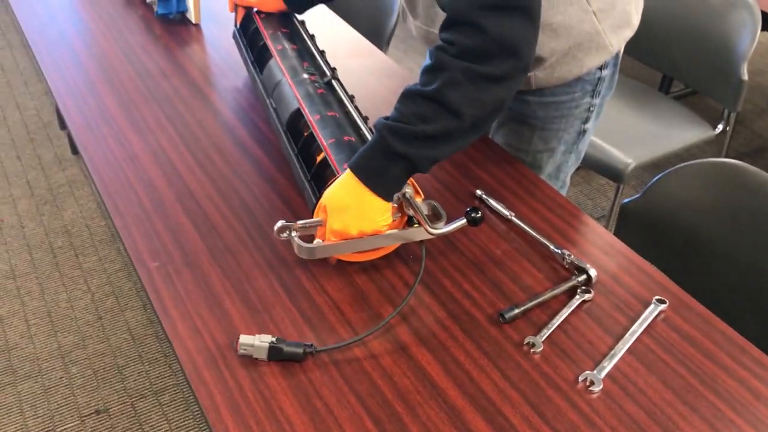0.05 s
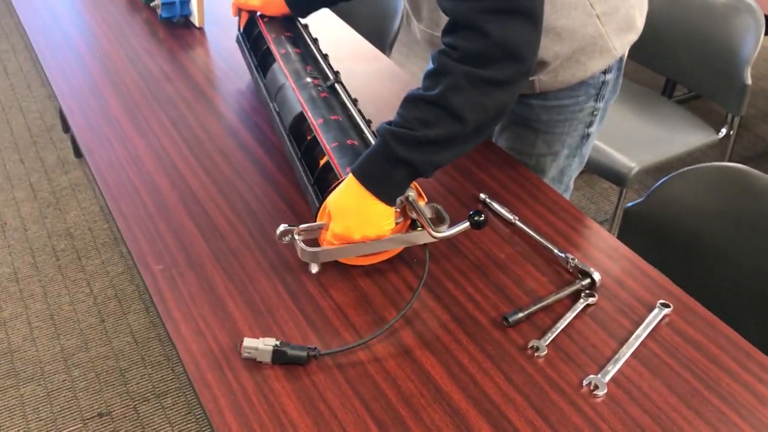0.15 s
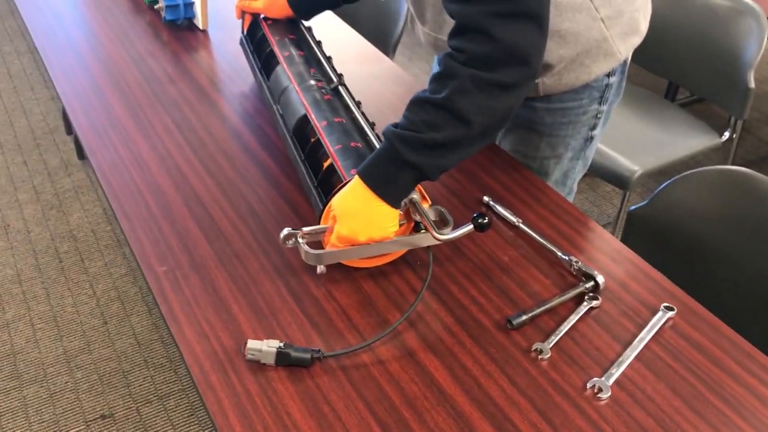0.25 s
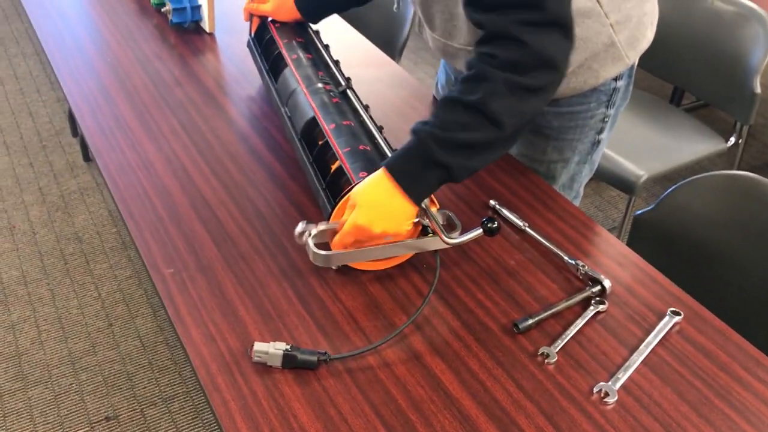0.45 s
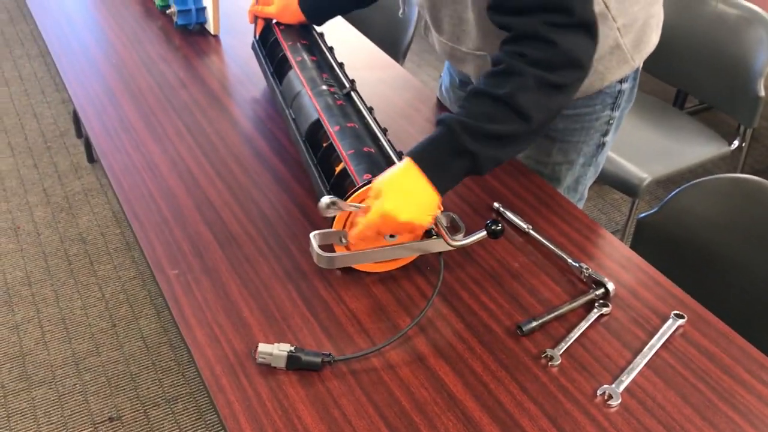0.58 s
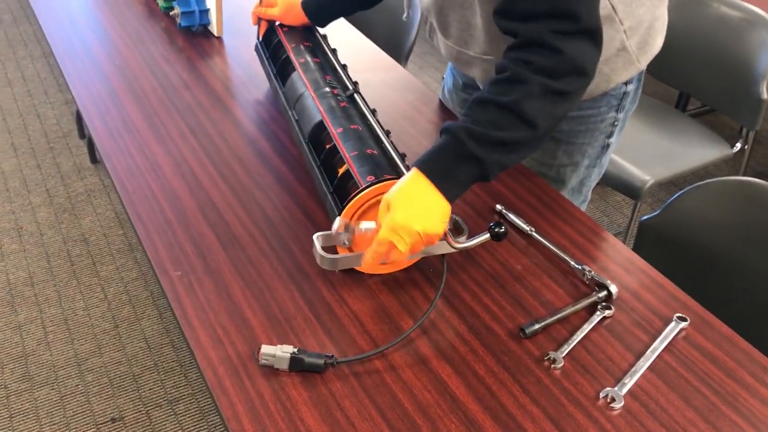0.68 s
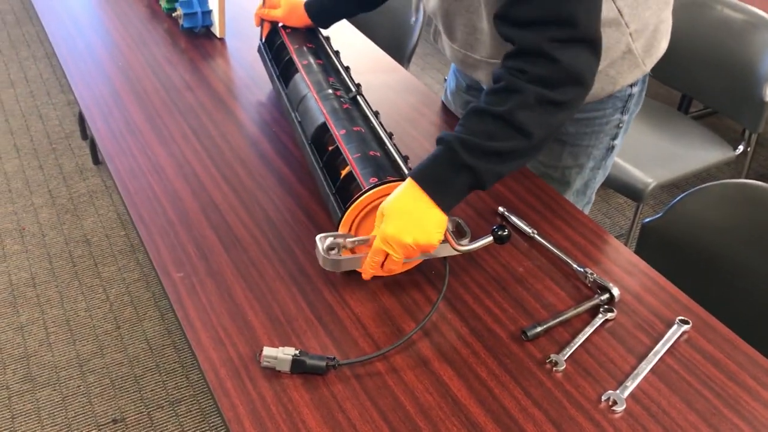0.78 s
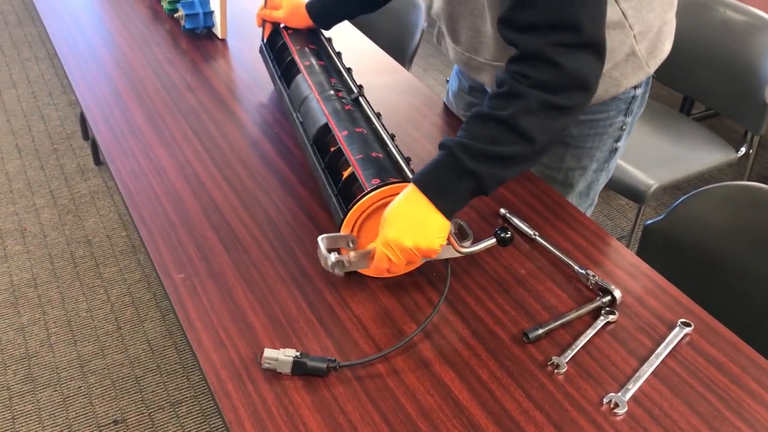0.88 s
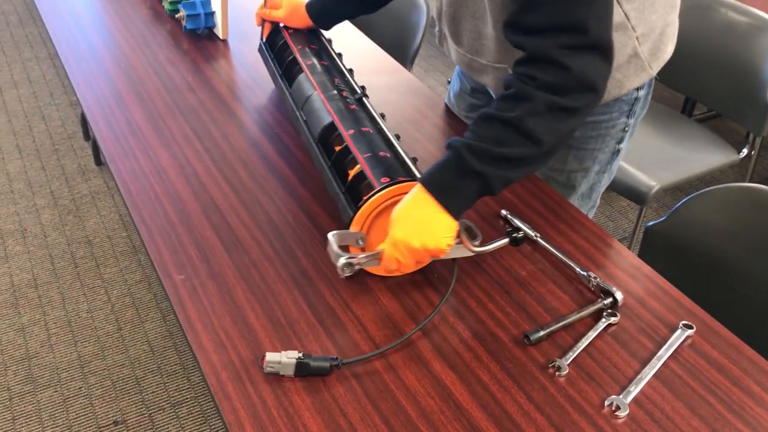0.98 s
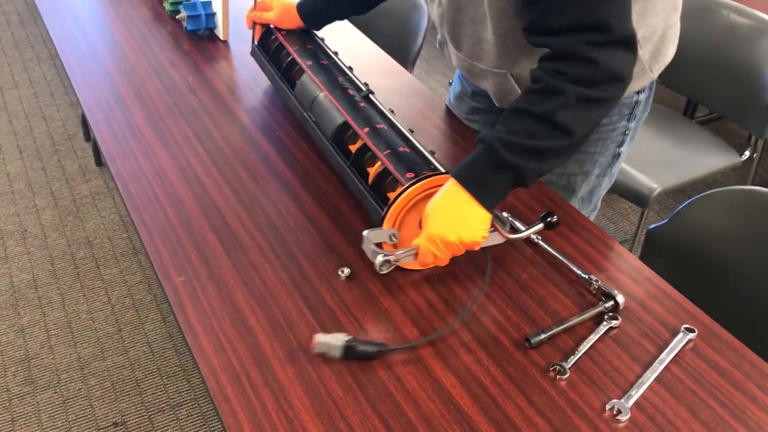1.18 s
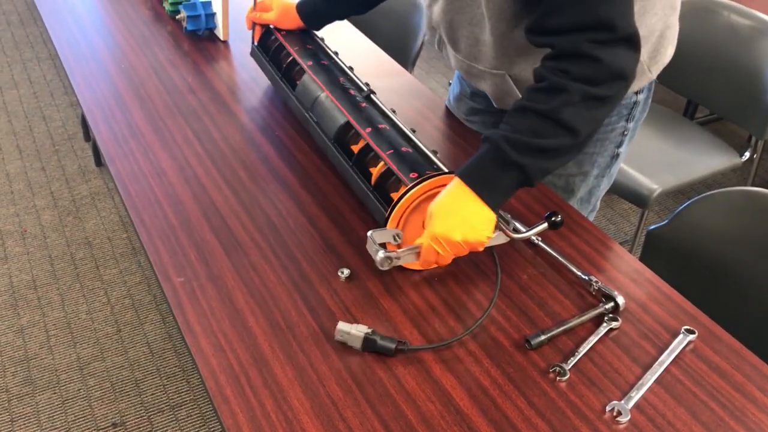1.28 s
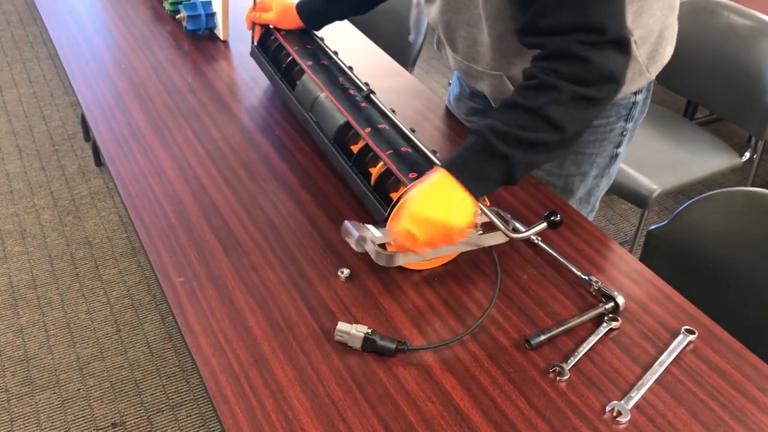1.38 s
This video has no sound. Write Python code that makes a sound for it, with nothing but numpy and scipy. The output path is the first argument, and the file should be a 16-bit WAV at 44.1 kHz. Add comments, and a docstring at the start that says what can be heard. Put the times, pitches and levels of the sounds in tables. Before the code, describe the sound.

A small metal part drops on a wooden table, bouncing and clinking to rest.

```python
"""In a small room, a small steel part falls on a wooden table and bounces ever faster.
Each bounce is a sharp tick plus a knock of the table top. The part clinks twice against metal
and rattles to rest. Around it a heavy drum with a steel crank is handled: the crank clanks,
a glove scuffs it, and the drum slides with a hollow groan while the table rumbles under it."""
import sys
import numpy as np
from scipy import signal
from scipy.fft import rfft, irfft
from scipy.io import wavfile

SR = 44100
rng = np.random.default_rng(int(sys.argv[2]) if len(sys.argv) > 2 else 0)


def waveform_to_disk(signal):
    """Save audio, clipped to [-1, 1], as 16-bit WAV at the path in sys.argv[1]."""
    frames = np.transpose(np.atleast_2d(signal))
    scaled = np.clip(frames, -1, 1) * 32767
    samples = np.round(scaled).astype(np.int16)
    wavfile.write(sys.argv[1], SR, samples)


N = 63945

# bounces on the wood (time [s], tick level [dB], knock level [dB], brightness [dB per octave])
BOUNCES = [(0.2038, 3, -1, -1.96), (0.3497, -3.5, -5, -1.6), (0.4591, .5, -6, 0), (0.4936, -7.5, -12, -0.3),
           (0.5475, -5.5, -12.5, -1.4), (0.6173, -4, -12, 1.3), (.6300, -15, -17, -0.5),
           (0.6607, -14.5, -20, -1.5), (0.6821, -11.5, -19.5, 2.5), (0.6905, -13, -19, -0.2),
           (0.7036, -15.5, -22.5, -3.1), (0.7189, -30, -26, 4.5), (0.7294, -20, -28, 5),
           (0.7321, -33, -21, 12.5), (.805, -22.5, -30, -4), (.8375, -28, -25, 2.9),
           (0.8692, -21, -26, 1.7), (0.882, -34.5, -36.5, 9), (0.897, -31, -29.5, 0.5),
           (0.9262, -34, -34.5, 4), (0.9441, -16, -26, 3.1)]
KNOCK_LAG_S = 0.0008  # waves come back from the edges of the top


def bounces():
    """Each time the steel part lands, it ticks and makes the table top ring."""
    out, contact = np.zeros(N), tick()
    for s, tick_db, knock_db, slope_db in BOUNCES:
        add(out, s - TICK_LEAD_S, amp(tick_db) * brighten(contact, slope_db))
        add(out, s + KNOCK_LAG_S, amp(knock_db) * brighten(knock(), slope_db))
    return out


# tone of the tick (pitch [Hz], level [dB])
TICK_TONE = [(30, -48), (150, -37), (500, -9), (1100, 5.5), (2500, 2.5), (4000, 1.5), (7800, -6),
             (10500, -24.5), (13000, -26), (16000, -26.5)]
TICK_DB, TICK_LEAD_S = 12, 0.001
SPREAD_S = 0.001296  # how far 1 kHz trails the very highest pitches


def tick():
    """A hit bends the wood. High pitches travel faster, so the wave is a tiny falling chirp."""
    hz = freqs()
    chirp = 4 * np.pi * SPREAD_S * (np.sqrt(1000 * hz) - hz / 2 * np.sqrt(1 / 7))
    phase = chirp + 2 * np.pi * hz * TICK_LEAD_S
    wave = irfft(amp(TICK_DB + read(TICK_TONE, hz)) * np.exp(-1j * phase), N)
    return wave * (np.arange(N) < N // 8)


# dense ring of the table top (pitch [Hz], level [dB], time to fade by 60 dB [s])
TABLE_RING = [(61.3, -34, 0.21), (215, -18.5, 0.34), (377, -12.5, 0.19), (550, -23, 0.16), (660, -11, 0.13),
              (860, -6, .1), (1420, 1.5, 0.075), (2600, -4, 0.093), (3880, -4, 0.02), (4870, -20.5, 0.079),
              (6600, -13.5, 0.019), (9400, -38, .035), (12300, -32, 0.078), (16000, -43, 0.03)]
# clearest notes of the table (pitch [Hz], level [dB], fade time [s])
TABLE_NOTES = [(173.2, -20, 0.61), (233.4, -11, 0.42), (275.5, -10, 0.29), (375.2, -10.5, 0.23),
               (831, -8, 0.28), (905, 5, 0.16), (1112, 2, 0.15), (1260, 5.5, 0.15), (1363, 4, 0.12),
               (1552, -5.5, 0.25), (1550, -13, 0.55), (1694, -6, 0.35), (1846, 5, 0.18), (1950, -22, .17),
               (2090, 1.5, 0.15), (2230, 0, 0.17), (2710, 0, 0.08), (2710, -1, 0.058), (3320, -2, 0.08),
               (3668, -3.5, 0.12)]
TABLE_RING_DB, TABLE_NOTES_DB = 0.5, -24
TABLE_LOW_HZ = 156  # the top gives off little sound below this


def knock():
    """The struck table top rings briefly with a woody knock."""
    top = amp(TABLE_RING_DB) * fading_noise(TABLE_RING) + amp(TABLE_NOTES_DB) * ring(TABLE_NOTES)
    return signal.sosfilt(signal.butter(2, TABLE_LOW_HZ, "high", fs=SR, output="sos"), top)


# the two clinks (time [s], ring level [dB], rasp level [dB], knock level [dB])
CLINKS = [(0.5769, -13.5, -16.5, -16), (.7390, -14, -14.5, -21.5)]
# notes of the first and of the second clink (pitch [Hz], level [dB], fade time [s])
HIGH_CLINK = [(657, -14, 0.11), (2163, -8, 0.026), (2573, -18, 0.045), (5280, -4.5, 0.048),
              (7170, 3, 0.024), (7660, -27, .026), (8830, -11, .025), (11100, -18, .025),
              (11980, -15, 0.04), (15300, -15, .03)]
LOW_CLINK = [(656, -14.5, 0.088), (2915, -12, 0.11), (4492, 5.5, 0.025), (4770, -5, 0.023),
             (5480, -14, 0.048), (6840, -13, 0.067), (8500, -27, 0.03), (9380, -15.5, 0.033),
             (11700, -29, 0.019), (15700, -19, .03)]
# noisy chatter of metal on metal (pitch [Hz], level [dB], fade time [s])
RASP = [(300, -30, 0.025), (1500, 5, 0.052), (4500, -4, 0.03), (8000, -4.5, 0.028), (11000, -25, 0.048),
        (15500, -10, 0.025)]
CLINK_KNOCK_LAG_S = 0.00201
CLINK_BLUR_HZ = 105  # the chattering contact smears each note


def clinks():
    """The part hits metal, which rings and rasps. Returns the steel and the knocks on the wood."""
    steel, wood = np.zeros(N), np.zeros(N)
    rise = fade_in(METAL_RISE_S)
    for (s, ring_db, rasp_db, knock_db), notes in zip(CLINKS, [HIGH_CLINK, LOW_CLINK]):
        ringing = amp(ring_db) * ring(notes, CLINK_BLUR_HZ)
        rasp = amp(rasp_db) * fading_noise(RASP)
        add(steel, s, rise * (ringing + rasp))
        add(wood, s + CLINK_KNOCK_LAG_S, rise * amp(knock_db) * brighten(knock(), slope_db=-3))
    return steel, wood


# clanks (time [s], ring level [dB], brightness [dB per octave], knock level [dB], thud level [dB])
CLANKS = [(.0058, -33, -1, -28, -34.5), (0.9883, -37, 2.2, -31, -40.5), (1.041, -46.5, 4.5, -35.5, -50),
          (1.361, -44.5, 3, -61, -66), (1.37, -47, 2.5, -65, -57)]
# notes of the crank and of the drum (pitch [Hz], level [dB], fade time [s])
CRANK_NOTES = [(647, -1, 0.059), (935, 6.5, 0.041), (1595, -2.5, 0.041), (2270, -5.5, 0.057),
               (3010, -15.5, .09), (3760, -2, 0.023), (4390, -3, 0.035), (5630, -4, 0.019),
               (7060, -6.5, 0.028), (9970, -14.5, 0.035)]
DRUM_NOTES = [(155, 1, .22), (273, -7, 0.35)]
METAL_RISE_S = 0.0017  # for clanks and clinks alike


def clanks():
    """The crank rings and the drum thuds. Returns that sound and the knocks on the wood."""
    steel, wood = np.zeros(N), np.zeros(N)
    for s, ring_db, slope_db, knock_db, thud_db in CLANKS:
        ringing = amp(ring_db) * brighten(ring(CRANK_NOTES), slope_db)
        thud = amp(thud_db) * ring(DRUM_NOTES)
        add(steel, s, fade_in(METAL_RISE_S) * (ringing + thud))
        add(wood, s, amp(knock_db) * knock())
    return steel, wood


# groan of the sliding drum (time [s], pitch [Hz], level [dB])
GROAN = [(1, 383, -59), (1.11, 374.6, -48.5), (1.2, 351.4, -43), (1.245, 346, -49.5), (1.275, 364.2, -37),
         (1.305, 402, -42.5), (1.37, 416, -46), (1.42, 417, -59)]
GROAN_WAVER_HZ = 19.2


def groan():
    """The sliding drum groans on one wavering note."""
    waver = unit(signal.sosfilt(signal.butter(2, 60, fs=SR, output="sos"), rng.standard_normal(N)))
    hz = curve(GROAN) + GROAN_WAVER_HZ * waver
    note = unit(np.sin(2 * np.pi * np.cumsum(hz) / SR))
    return note * amp(curve(GROAN, axis=2)) * (times() > GROAN[0][0])


# loudness of the slide (time [s], level [dB])
SLIDE_LEVEL = [(.75, -42), (1.06, -51.5), (1.14, -45.5), (1.22, -40), (1.29, -41), (1.36, -44.5),
               (1.4, -73.5), (1.42, -82)]
# tone of the slide (pitch [Hz], level [dB])
SLIDE_TONE = [(100, -33), (240, -7), (420, 7), (520, -3), (900, 7.5), (1150, -1), (1450, 2), (2100, -12.5),
              (5000, -15), (10000, -27.5), (16000, -31)]


def slide():
    """The drum rubs over the table."""
    return noise(SLIDE_TONE) * amp(curve(SLIDE_LEVEL)) * (times() > SLIDE_LEVEL[0][0])


# loudness of the hollow sound (time [s], level [dB])
HOLLOW_LEVEL = [(0, -52), (.15, -61), (.7, -48), (.95, -56.5), (1.06, -47.5), (1.15, -42), (1.25, -49),
                (1.42, -44), (1.45, -62)]
# tone of the hollow sound (pitch [Hz], level [dB])
HOLLOW_TONE = [(100, -35), (180, -9.5), (245, -3), (310, -14.5), (385, 0), (490, -29), (620, -9.5),
               (800, -18.5), (2000, -40.5)]


def hollow():
    """The drum sounds hollow as it is pushed."""
    return noise(HOLLOW_TONE) * amp(curve(HOLLOW_LEVEL))


# loudness of the rumble (time [s], level [dB])
RUMBLE_LEVEL = [(0, -50.5), (.18, -52), (.52, -66.5), (.6, -48), (.73, -49), (.765, -41.5), (.87, -45.5),
                (.93, -48), (1.02, -48), (1.12, -46), (1.28, -50.5), (1.33, -52), (1.45, -63)]
# tone of the rumble (pitch [Hz], level [dB])
RUMBLE_TONE = [(25, -22), (60, -15), (85, 6), (115, 1), (160, -4), (230, -30), (600, -47), (2000, -73)]


def rumble():
    """The table rumbles under the heavy drum."""
    return noise(RUMBLE_TONE) * amp(curve(RUMBLE_LEVEL))


# tone of the scuff (pitch [Hz], level [dB])
SCUFF_TONE = [(300, -18), (1500, 0), (4400, 0), (6000, -3), (9000, -11.5), (12000, -25), (16000, -24)]
SCUFF_AT_S, SCUFF_WIDTH_S, SCUFF_DB = 0.1105, 0.0065, -41


def scuff():
    """A glove brushes the crank once, lightly."""
    return noise(SCUFF_TONE) * amp(SCUFF_DB) / (1 + ((times() - SCUFF_AT_S) / SCUFF_WIDTH_S) ** 2)


# echo of the room (pitch [Hz], level [dB], fade time [s])
ECHO = [(100, -0.5, 0.34), (367, -3, 0.42), (520, -4.5, 0.47), (900, -6.5, 0.42), (2700, -2, 0.4),
        (5030, -7.5, 0.27), (7900, -10, 0.22), (15000, 3, 0.11)]
ECHO_DB, ECHO_RISE_S, METAL_ECHO_DB = -38.5, 0.017, 1.5


def room_echo(x):
    """The small room answers a sound with a short, smooth echo."""
    tail = fading_noise(ECHO) * fade_in(ECHO_RISE_S) ** 2
    return amp(ECHO_DB) * signal.fftconvolve(x, tail)[:N]


# tone of the room's air (pitch [Hz], level [dB])
AIR_TONE = [(20, 1.5), (80, 1), (250, -23), (550, -19.5), (1500, -11), (4000, -22), (9000, -29.5),
            (16000, -54)]
AIR_DB = -56.5


def air():
    """The air of the room is a quiet, steady hush."""
    return amp(AIR_DB) * noise(AIR_TONE)


def amp(db):
    """Turns decibels into a volume factor."""
    return 10 ** (np.asarray(db) / 20)


def unit(x):
    """Scales a sound to an average power of 1."""
    return x / np.sqrt(np.mean(x ** 2) + 1e-20)


def times():
    """The time of every sample, in seconds."""
    return np.arange(N) / SR


def freqs():
    """Every pitch in a full-length spectrum, in Hz."""
    return np.fft.rfftfreq(N, 1 / SR)


def read(points, hz, axis=1):
    """Looks up one column of a pitch table, gliding between its rows."""
    table = np.transpose(points)
    return np.interp(np.log(hz + 1), np.log(table[0]), table[axis])


def curve(points, axis=1):
    """Looks up one column of a time table at every sample."""
    table = np.transpose(points)
    return np.interp(times(), table[0], table[axis])


def fade_in(seconds):
    """Climbs from 0 to 1, then stays there."""
    return np.minimum(times() / seconds, 1)


def add(mix, s, sound):
    """Mixes a sound in at time s."""
    part = mix[max(round(s * SR), 0):][:len(sound)]
    part += sound[:len(part)]


def noise(tone):
    """Steady noise, shaped by a tone table."""
    return unit(irfft(rfft(rng.standard_normal(N)) * amp(read(tone, freqs())), N))


def fading_noise(table):
    """Dense random ringing; each narrow band of pitches has its own level and fade time."""
    t, out = times(), np.zeros(N)
    centres = np.geomspace(350, 17500, num=28) - 300
    place = np.interp(freqs(), centres, np.arange(len(centres)))
    white = rfft(rng.choice([-1., 1.], N))
    for k, centre in enumerate(centres):
        share = np.maximum(1 - abs(place - k), 0)
        fade = amp(-60 * t / max(read(table, centre, axis=2), .005))
        band = irfft(white * share, N) * fade
        even_out = np.sqrt(share.mean() * np.sum(fade ** 2) / np.sum(band ** 2))
        out += band * even_out * amp(read(table, centre))
    return out


def ring(notes, blur_hz=0):
    """The fading pure notes of a struck object; random wandering can blur them."""
    t, out = times(), np.zeros(N)
    step = np.sqrt(2 * np.pi * blur_hz / SR)
    for hz, db, fade_s in notes:
        wander = np.cumsum(rng.standard_normal(N)) * step if blur_hz else 0
        out += amp(db - 60 * t / fade_s) * np.sin(2 * np.pi * (hz * t + rng.random()) + wander)
    return out


def brighten(x, slope_db, peak_hz=5100):
    """A harder, shorter hit is brighter, most of all near peak_hz. A negative slope dulls it."""
    octaves = np.log2(np.maximum(freqs(), 200) / peak_hz)
    gain_db = slope_db * (np.log2(peak_hz / 2000) - abs(octaves))
    size = 2 * N
    log_gain = np.log(amp(np.interp(abs(np.fft.fftfreq(size, 1 / SR)), freqs(), gain_db)))
    response = np.exp(np.conj(signal.hilbert(log_gain)))[:N + 1]  # nothing sounds before the hit
    return irfft(rfft(x, size) * response, size)[:N]


def scene():
    """Adds up the hits, their echo, the handling of the drum and the air, in one channel."""
    clink_steel, clink_wood = clinks()
    clank_steel, clank_wood = clanks()
    steel = clink_steel + clank_steel
    wood = clink_wood + clank_wood + bounces()
    echo = room_echo(wood + amp(METAL_ECHO_DB) * steel)
    handling = groan() + slide() + scuff() + hollow() + rumble()
    return (wood + steel + echo + handling + air())[None]


def record(dry):
    """Flattens the loudest peaks, then cuts the treble above 16.2 kHz."""
    treble_cut = signal.firwin(255, 16200, window=("kaiser", 8), fs=SR)
    return signal.oaconvolve(np.clip(dry, -1, 1), treble_cut[None], "same")


dry = scene()
out = record(dry)
waveform_to_disk(out)
```